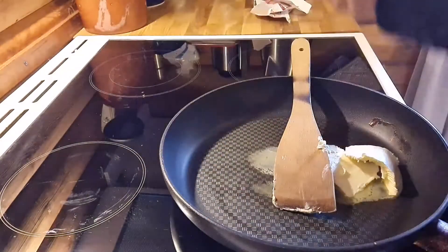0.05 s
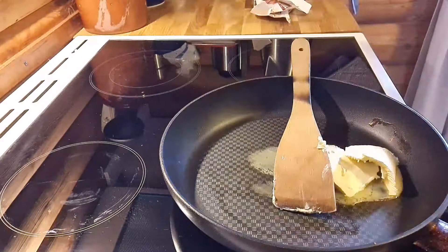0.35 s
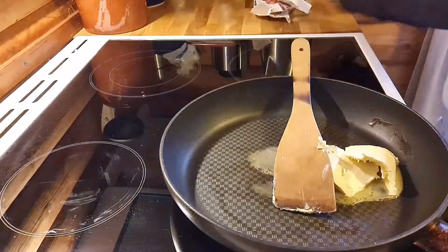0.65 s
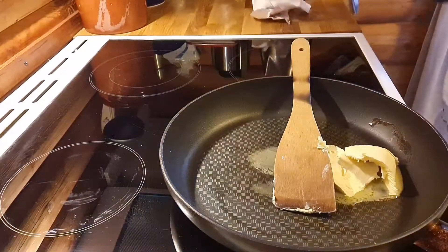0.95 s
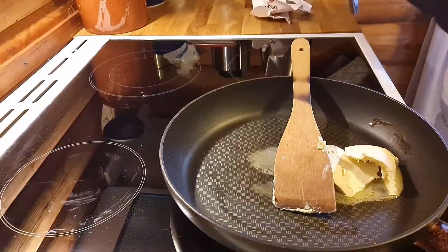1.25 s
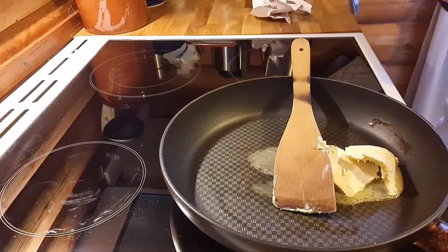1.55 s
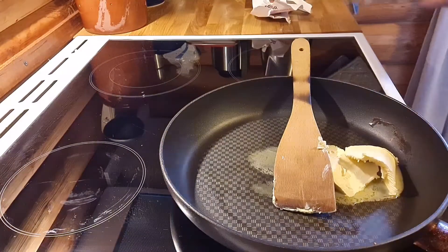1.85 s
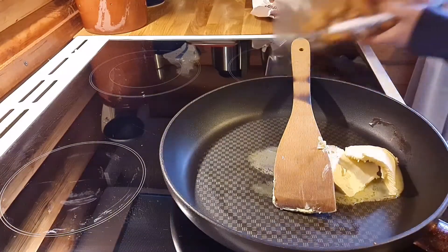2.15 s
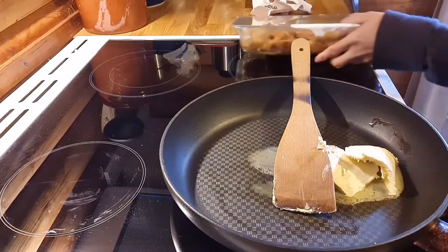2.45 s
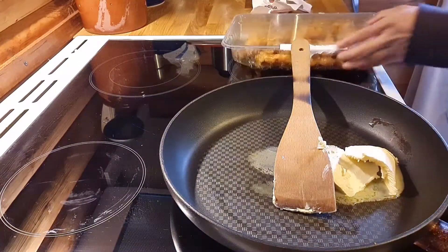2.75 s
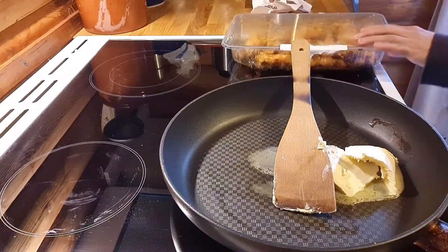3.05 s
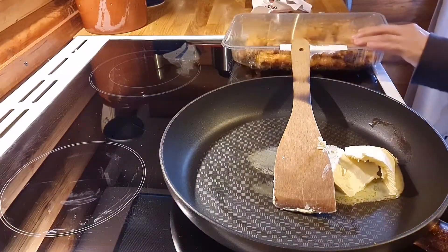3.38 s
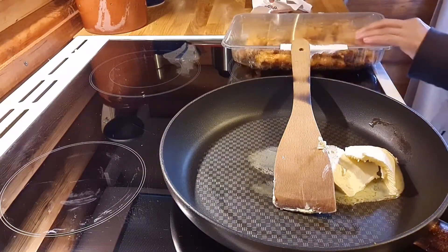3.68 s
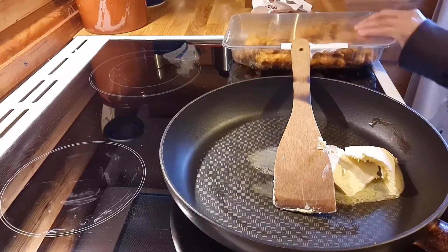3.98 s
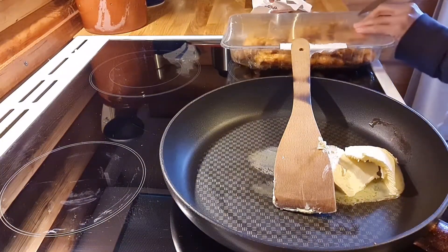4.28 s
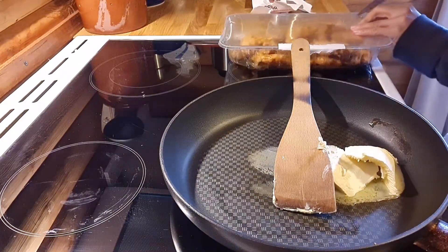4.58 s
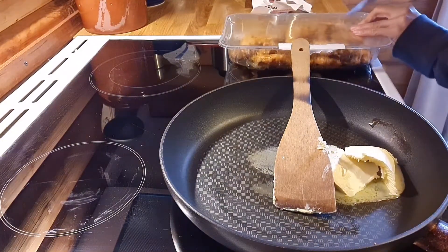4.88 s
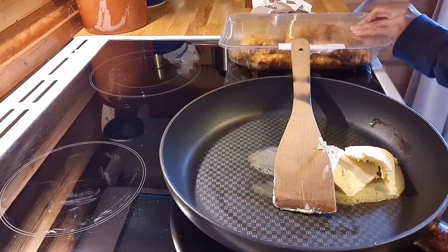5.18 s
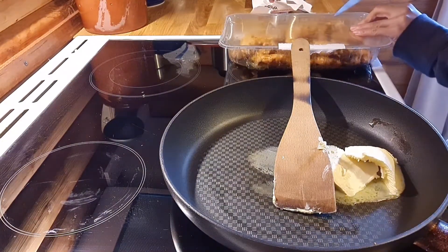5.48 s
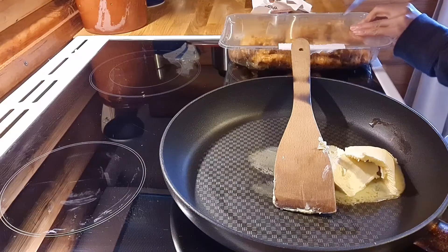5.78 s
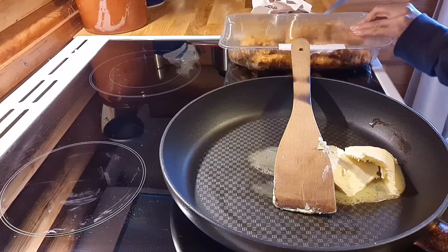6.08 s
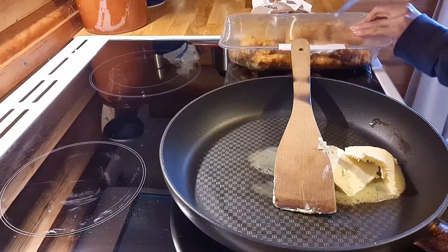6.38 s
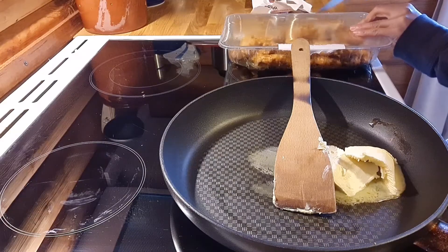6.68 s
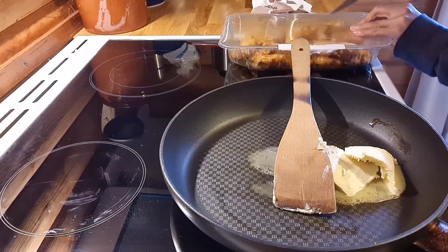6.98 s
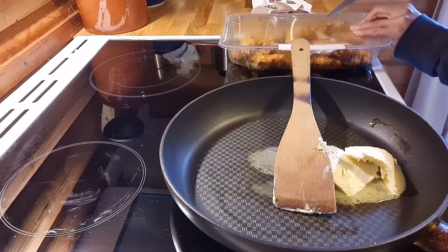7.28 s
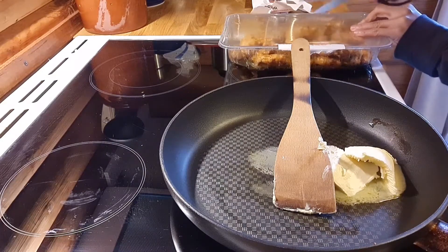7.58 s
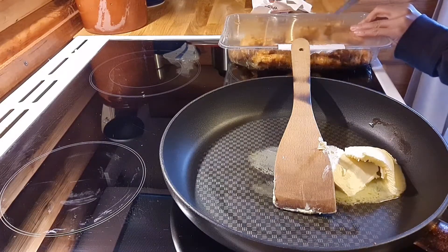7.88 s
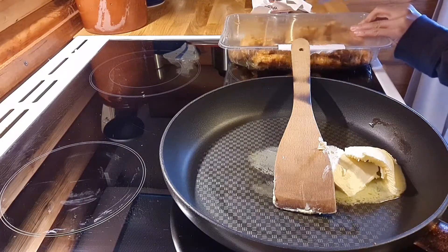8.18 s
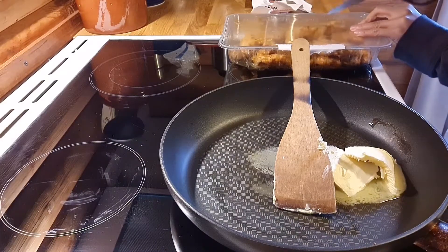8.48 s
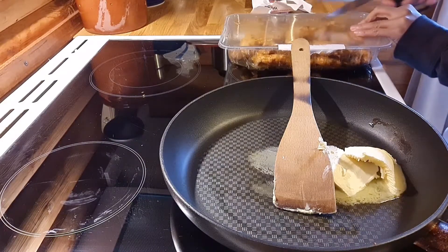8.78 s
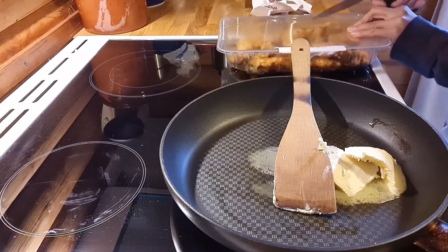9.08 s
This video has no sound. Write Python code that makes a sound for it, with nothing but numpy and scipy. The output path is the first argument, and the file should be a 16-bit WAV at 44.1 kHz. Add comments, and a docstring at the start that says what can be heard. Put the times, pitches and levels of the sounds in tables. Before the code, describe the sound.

A thin plastic food tray is set down and prised open, with snaps, crunches, rubbing and dull bumps over a low hum.

```python
"""In a small kitchen, a thin plastic food tray is slid out of its wrap, set down on a glass hob
and prised at until its lid gives. The plastic buckles in snaps and crunches, and patches of the lid
flip with a hollow tock. Film and fingers rub over the tray; it scrapes, rocks and bumps, and the
hob booms under it. The room gives a short echo, over the low hum of an appliance."""
import sys
import numpy as np
from scipy import signal
from scipy.fft import rfft, irfft
from scipy.io import wavfile

SR = 44100
rng = np.random.default_rng(int(sys.argv[2]) if len(sys.argv) > 2 else 0)


def materialize(psi):
    """Save the field psi as 16-bit PCM at rate SR to the path in sys.argv[1].

    A 1-D psi becomes a single channel; in a 2-D psi each row is a channel.
    """
    bounded = np.clip(np.atleast_2d(psi).T, -1, 1)
    quanta = np.round(bounded * 32767).astype(np.int16)
    wavfile.write(sys.argv[1], SR, quanta)


N = 407484


def buckle(db, thud_db, crack_db, fizz_db, ring_ms, build_ms, pop=3.3, energy_ms=4.3, size=2048):
    """One buckle: tiny slips build up, then the plastic sheet pops over and flutters out."""
    # pitch ranges of the thud, body, crack and fizz: low_hz, high_hz
    ranges = [(80, 400), (400, 2000), (2500, 8000), (8000, 16000)]
    ms = (np.arange(size) - size // 2) * 1000 / SR  # the pop lies in the middle
    force = rng.standard_normal(size) * np.exp(-np.maximum(ms / ring_ms, -ms / build_ms))
    force[size // 2] += pop * np.sqrt(ring_ms) * undb(0.25 * crack_db)  # dull knocks pop less
    # a crack has no pitch, so even out its peaks and dips
    spectrum = rfft(force, 2 * size)
    force = irfft(spectrum * causal(-.75 * np.log(np.abs(spectrum) + 1e-3)))
    force *= np.sqrt(energy_ms * SR / 1000 / np.sum(force ** 2))
    low, high = np.transpose(ranges)
    db_per_hz = db + np.array([thud_db, 0, crack_db, fizz_db]) - 10 * np.log10(2 * (high - low) / SR)
    return through(force, response(np.c_[np.sqrt(low * high), db_per_hz], size=size))


def buckles(events, ring_ms, build_ms, echo_db=3.5, hidden=0.074, shell_db=2.5, size=2048):
    """The plastic shell buckles at a new spot each time, so each blow has its own echo."""
    # tone of the shell: pitch_hz, level_db
    shell_tone = [(30, -21.5), (70, -17.5), (100, -3), (140, 4), (190, -5.5), (270, -4), (600, -5),
                  (1000, -3), (1700, 1.5), (2400, -1.5), (3300, 0), (4500, 2.5), (9000, 2.5), (13000, 1),
                  (16000, -2)]
    out, shell = np.zeros((2, N)), undb(shell_db) * response(shell_tone)
    for start_s, db, thud_db, crack_db, fizz_db in events:
        blow = through(buckle(db, thud_db, crack_db, fizz_db, ring_ms, build_ms), shell)
        room_db = echo_db - hidden * crack_db  # dull blows come from the covered side: more echo
        add(out, start_s - size // 2 / SR, kitchen(blow, room_db) / np.hypot(1, undb(room_db)))
    return out


def snaps(drag):
    """The shell gives all at once, in sharp snaps and in small creases as it slides."""
    # sudden buckles: time_s, level_db, thud_db, crack_db, fizz_db (last three added to level_db)
    sudden_buckles = [(0.003, -31.5, -7.5, -24, -28), (0.05, -42.5, -25, -21.5, -20),
                      (0.386, -36, -7, -9, -14), (0.466, -38, -23.5, 5, 7), (0.992, -42.5, -37, -3.5, -21),
                      (1.096, -54, -3, -3, -14), (1.238, -45.5, 14.5, -12.5, -8.5),
                      (1.853, -38, -17, -16, -21), (1.966, -51, -9, -4, -1), (2.076, -62, 3, -8.5, 0),
                      (2.444, -26, -7, -21, -28.5), (2.469, -34, -4.5, -14, -22),
                      (2.516, -17.5, -5.5, -23.5, -34), (2.917, -30, -2.5, -1, -11),
                      (3.386, -52.5, 8.5, -1.5, -11.5), (4.537, -52, -0.5, -9, -8),
                      (5.642, -46.5, -8, -19, -27), (5.728, -71, 3, -7, 10), (6.021, -26, -2, -7.5, -8),
                      (6.107, -40.5, -16, -17.5, -19), (6.266, -37.5, -23.5, -20, -20.5),
                      (7.013, -41, 3.5, -27.5, -32.5), (7.304, -49.5, -13.5, -45, -27),
                      (7.503, -33, -18.5, -27.5, -34), (7.551, -21.5, -16, -38, -56),
                      (7.61, -26, -6.5, -15.5, -26), (8.026, -24, -17.5, -32.5, -43),
                      (8.065, -15.5, -33, -7, -21), (8.084, -17, -8.5, -20, -20),
                      (8.189, -23, -14, -15.5, -20.5), (8.585, -35, 6.5, -35.5, -40),
                      (8.624, -42, -1, -22, -29), (8.898, -19, -6.5, -17, -28.5),
                      (9.154, -47.5, 6, -22, -22)]
    return buckles(sudden_buckles + creases(drag), ring_ms=2.5, build_ms=0.27)


def crunches():
    """Creases in the shell build up before they give."""
    # slower buckles: time_s, level_db, thud_db, crack_db, fizz_db (last three added to level_db)
    slow_buckles = [(0.546, -23.5, -1, -10.5, -10), (0.574, -21.5, -21, -13, -34),
                    (0.587, -23.5, -27, -21, -32), (0.664, -33.5, 1, -15, -24), (1.562, -33, -36, -20, -53),
                    (2.288, -31.5, 1, -12, -29), (2.596, -32, -6.5, -21, -14.5),
                    (2.791, -25.5, 2.5, -8, -10), (4.281, -25.5, -4, -26, -31),
                    (6.558, -23.5, -8, -14.5, -22), (6.706, -26.5, -9.5, -33, -35),
                    (6.718, -24.5, -20, -25, -38), (8.222, -20, -8, -15.5, -18),
                    (8.236, -26.5, -5, -33, -35), (8.779, -30, -27, -18.5, -21),
                    (9.175, -31.5, -14, -17.5, -22.5)]
    return buckles(slow_buckles, ring_ms=5.2, build_ms=3.0)


def creases(drag, count=44, above_drag_db=8, scatter_db=3, thud_db=-14, crack_db=-14.5, fizz_db=-22.5):
    """List small creases that give at random moments, louder when the tray slides harder."""
    moments = rng.integers(0, N, count)
    levels = 20 * np.log10(drag[moments] + 1e-6) + above_drag_db + scatter_db * rng.standard_normal(count)
    return [(i / SR, db, thud_db, crack_db, fizz_db) for i, db in zip(moments, levels)]


def tray(sound, direct=0.58, ring=0.48, size=4096):
    """The tray's walls pass each sound on and ring briefly at their own pitches."""
    # ringing of the walls (wider fades sooner): pitch_hz, width_hz, level_db
    wall_notes = [(280.4, 14, 6), (447, 26, -11.5), (503, 110, 1), (618, 13, -0.5), (754, 43, 2),
                  (842, 160, 1.5), (1010, 28, 2), (1320, 9.7, -0.5), (1485, 9.1, -7.5), (1857, 6.1, -1.5),
                  (2770, 720, -8.5), (4100, 580, -6)]
    t, walls = np.arange(size) / SR, np.zeros(size)
    for hz, width, db in wall_notes:
        fade = 2 * np.pi * width / SR * np.exp(-np.pi * width * t)
        walls += ring * undb(db) * fade * np.cos(2 * np.pi * hz * t)
    walls[0] += direct
    return np.array([through(ear, walls) for ear in sound])


def tocks(fade_s=0.068):
    """A patch of the lid flips over with a hollow tock, at a pitch set by its size."""
    # flips: start_s, level_db, pitch_hz
    flips = [(6.266, -42, 788), (6.718, -33.5, 1315), (7.609, -30, 1034), (8.025, -33, 950),
             (8.225, -32, 1450), (9.174, -45, 1030)]
    out = np.zeros(N)
    for start_s, db, hz in flips:
        add(out, start_s, undb(db) * ringing(hz, fade_s, contact_s=1 / hz))
    return out


def strokes(drop_db=13.5, roundness=1.41):
    """How strongly the tray slides and the film rustles as each hand stroke speeds up and slows."""
    # hand strokes: fastest_s, rise_s, fall_s, drag_db, crinkle_db
    hand_moves = [(0.10, 0.17, 0.65, -47.5, -58), (0.39, 0.011, 0.037, -59, -49.5),
                  (0.529, 0.059, 0.05, -33.5, -37.5), (0.66, 0.062, 0.077, -47.5, -77),
                  (0.785, 0.09, 0.11, -86, -60.5), (0.995, .006, 0.12, -57, -59.5),
                  (1.249, 0.02, 0.094, -47, -65), (1.48, 0.1, 0.14, -51, -72.5),
                  (1.688, 0.099, .12, -45, -60), (1.864, 0.09, 0.12, -50.5, -65),
                  (2.21, 0.042, 0.032, -55, -84), (2.325, 0.057, .1, -43.5, -63.5),
                  (2.604, 0.011, 0.026, -37, -61), (2.786, 0.067, 0.01, -49, -43.5),
                  (3.033, 0.075, 0.058, -50, -64.5), (3.41, 0.24, 0.26, -70.5, -80.5),
                  (3.8, 0.2, 0.12, -78.5, -76), (4.098, .13, 0.13, -54.5, -59),
                  (4.539, 0.068, 0.1, -65, -75.5), (4.85, .2, 0.18, -84, -84.5),
                  (5.48, 0.15, 0.099, -69.5, -76.5), (5.655, 0.029, 0.12, -69, -80),
                  (5.99, 0.032, 0.025, -70.5, -63.5), (6.16, .04, 0.16, -70.5, -78.5),
                  (6.53, 0.036, .015, -64.5, -70.5), (7.11, .06, 0.089, -72, -81.5),
                  (7.34, 0.12, 0.35, -73, -80), (7.562, 0.062, 0.062, -45.5, -61.5),
                  (8.82, .11, 0.17, -52, -62)]
    power = np.zeros((2, N))
    for fastest_s, rise_s, fall_s, drag_db, crinkle_db in hand_moves:
        t = np.arange(-int(3 * rise_s * SR), int(3 * fall_s * SR)) / SR
        speed = undb(-drop_db * np.maximum(-t / rise_s, t / fall_s) ** roundness)
        add(power, fastest_s + t[0], (undb([[drag_db], [crinkle_db]]) * speed) ** 2)
    return np.sqrt(power)


def rubbing(drag, crinkle, slide_db=-3, chatter_share=0.5, film_db=-2):
    """Each stroke drags the tray (dull, coarse) and crinkles the film (bright, fine)."""
    # tone of the sliding tray: pitch_hz, level_db
    slide_tone = [(60, -33.5), (140, 2.5), (300, -3.5), (550, -4.5), (900, -6.5), (1800, -5.5),
                  (3000, -12.5), (6000, -23.5), (16000, -40.5)]
    # tone of the film: pitch_hz, level_db
    film_tone = [(500, -33), (2000, 1.5), (4000, -0.5), (7500, 4.5), (9500, -0.5), (13000, 0.5),
                 (16000, -5.5)]
    coarse = friction(per_s=900, spread_db=0.5, hiss_share=0.98) + chatter_share * chatter()
    fine = friction(per_s=1800, spread_db=8.0, hiss_share=0.26)
    slide = undb(slide_db) * drag * unit(through(coarse, response(slide_tone)))
    film = undb(film_db) * crinkle * unit(through(fine, response(film_tone)))
    return (kitchen(slide, echo_db=0) + kitchen(film, echo_db=9))[:, :N]


def friction(per_s, spread_db, hiss_share):
    """Surfaces stick and slip, making uneven ticks over a smooth hiss."""
    chance, sign, hiss = rng.random(N), rng.standard_normal(N), rng.standard_normal(N)
    sizes = undb(spread_db * np.minimum(rng.exponential(size=N), 4))
    ticks = (chance < per_s / SR) * np.sign(sign) * sizes
    return unit(unit(ticks) + hiss_share * hiss)


def chatter(per_s=260, spread_db=4.0, low_hz=350, high_hz=3800, cycles=4.5, size=1024):
    """Small folds catch and let go, each ringing briefly at a pitch of its own."""
    out, t = np.zeros(N), np.arange(size) / SR
    for when, pitch, luck in rng.random((int(per_s * N / SR), 3)):
        hz = low_hz * (high_hz / low_hz) ** pitch
        strength = undb(-spread_db * np.log(luck + .03)) * hz
        add(out, when * N / SR, strength * np.sin(2 * np.pi * hz * t) * np.exp(-hz * t / cycles))
    return unit(out)


def bumps(fade_cycles=19):
    """The weight of the food booms in the surface below; low booms last longer."""
    # landings of the tray: start_s, level_db, pitch_hz
    landings = [(0.002, -27, 270), (0.634, -24.5, 120.4), (0.645, -34, 282), (1.243, -31.5, 116),
                (2.301, -42, 154), (2.533, -29.5, 69.2), (2.785, -26.5, 241), (2.803, -28, 71.2),
                (2.933, -28, 135), (2.972, -27, 159), (4.278, -27.5, 99), (8.238, -29.5, 153)]
    out = np.zeros(N)
    for start_s, db, hz in landings:
        add(out, start_s, undb(db) * ringing(hz, fade_cycles / hz, contact_s=1.1 / hz))
    return out


def rocking():
    """The tray rocks to rest: its rim ticks and its loaded floor answers dully, never quite alike."""
    # touches of the rim: start_s, level_db, hardness_db (treble boost per octave)
    touches = [(2.917, -46.5, 10.5), (2.952, -40.5, -1), (3.154, -61, 5), (3.177, -51, -6),
               (3.339, -60.5, 1.5), (3.384, -51, -1)]
    # ringing of the rocked tray: pitch_hz, level_db, fade_s
    notes = [(291, 12, 0.086), (520, -5.5, 0.11), (1020, -10.5, 0.067), (1118, -3.5, 0.057),
             (1700, -30.5, 0.031)]
    out, lowest_hz = np.zeros(N), notes[0][0]
    for start_s, db, hardness_db in touches:
        for hz, note_db, fade_s in notes:
            strength = undb(db + note_db + hardness_db * np.log2(hz / lowest_hz))
            add(out, start_s, strength * ringing(hz * rng.uniform(.975, 1.025), fade_s, contact_s=1 / hz))
    return out


def scrapes(band_ratio=1.5):
    """The rim judders under a finger or along the surface, swelling and fading around a rough pitch."""
    # scrapes of the rim: start_s, length_s, level_db, pitch_hz
    rim_scrapes = [(1.227, 0.098, -59.5, 213), (1.377, 0.15, -51.5, 139), (1.824, 0.074, -49.5, 600),
                   (2.266, 0.12, -44, 950), (2.705, 0.096, -54.5, 810), (2.788, 0.0097, -28.5, 870),
                   (4.992, 0.1, -71, 980), (5.423, 0.089, -77.5, 920)]
    out, slips = np.zeros(N), friction(per_s=270, spread_db=6.0, hiss_share=0.96)
    for start_s, length_s, db, hz in rim_scrapes:
        band = signal.butter(2, [hz / band_ratio, hz * band_ratio], "bandpass", fs=SR, output="sos")
        judder = unit(signal.sosfilt(band, slips[int(start_s * SR):int((start_s + length_s) * SR)]))
        add(out, start_s, undb(db) * judder * signal.windows.tukey(len(judder)))
    return out


def rumble(handling, gain_db=-31, follow=0.52, linger_samples=4000):
    """Handling shakes the worktop, which rumbles on a little after each move."""
    # tone of the worktop: pitch_hz, level_db
    worktop_tone = [(15, -25.5), (30, -8), (50, 2.5), (75, -1), (130, -5), (220, -21.5), (600, -62.5)]
    effort = signal.lfilter([1 / linger_samples], [1, 1 / linger_samples - 1], np.abs(handling[0]))
    shaking = unit(through(rng.standard_normal(N), response(worktop_tone)))
    return undb(gain_db) * effort ** follow * shaking


def kitchen(sound, echo_db, build_s=0.0003, right_lag_samples=8, size=10240):
    """Sound reaches the left side first; hob, worktop and walls answer with a short, dense echo."""
    # the room's echo: pitch_hz, fade_s (to fall 60 dB), level_db
    echo_bands = [(100, 0.43, -5.5), (264.5, 0.25, 1), (700, 0.19, -2.5), (1800, 0.18, -1),
                  (5230, 0.15, -1), (13000, 0.16, 0)]
    t, hz = np.arange(size) / SR, np.fft.rfftfreq(size, 1 / SR)
    noise, echo = rfft(diffuse(size)), 0
    centres = np.transpose(echo_bands)[0]
    for share, (_, fade_s, db) in zip(np.eye(len(echo_bands)), echo_bands):
        band = irfft(noise * read(np.c_[centres, share], hz))
        echo = echo + undb(db) * band * np.exp(-np.log(1000) * t / fade_s)
    echo = unit(echo * (1 - np.exp(-t / build_s))) * undb(echo_db) / np.sqrt(size)
    echo[0, 0] += 1  # the direct sound
    echo[1, right_lag_samples] += 1
    return signal.oaconvolve(sound[None], echo, axes=1)


def hum(waver_db=3.5, wander_hz=4, swell_db=3.0, air_db=-62, left_db=-1.5):
    """An appliance hums in low, wavering tones over the room's rumble and faint hiss."""
    # tones of the appliance: pitch_hz, level_db
    hum_notes = [(73, -63), (116, -62), (240, -77)]
    # tone of the still room: pitch_hz, level_db
    air_tone = [(20, -14), (45, -1), (70, 0), (140, -1), (200, -10), (310, -22), (500, -27), (1000, -32),
                (2000, -42.5), (4000, -46), (8000, -45), (15000, -46.5)]
    tones = np.zeros(N)
    for hz, db in hum_notes:
        strength = undb(db + waver_db * drift(9.8)) * np.sqrt(2)
        pitch_hz = hz + wander_hz * drift(17)
        tones += strength * np.sin(2 * np.pi * np.cumsum(pitch_hz) / SR)
    air = unit(np.array([through(ear, response(air_tone)) for ear in diffuse(N)]))
    return (tones * undb(swell_db * drift(15)) + undb(air_db) * air) * undb([[left_db], [0]])


def diffuse(size, alike_below_hz=480):
    """Noise from all sides: left and right are alike in the bass, unrelated in the treble."""
    likeness = .97 / (1 + (np.fft.rfftfreq(size, 1 / SR) / alike_below_hz) ** 3)
    mid, side = rfft(rng.standard_normal((2, size)))
    mid, side = mid * np.sqrt((1 + likeness) / 2), side * np.sqrt((1 - likeness) / 2)
    return irfft([mid + side, mid - side], size)


def ringing(hz, fade_s, contact_s):
    """One softly struck note that falls 60 dB in fade_s."""
    t = np.arange(SR // 2) / SR
    return np.sin(2 * np.pi * hz * t) * np.exp(-np.log(1000) * t / fade_s) * (1 - np.exp(-t / contact_s))


def drift(per_s):
    """Glide between random values, mostly within -1 to 1."""
    values = rng.standard_normal(int(N / SR * per_s) + 2)
    return np.interp(np.arange(N) / SR * per_s, np.arange(len(values)), values)


def undb(db):
    """Turn decibels into a multiplier."""
    return 10 ** (np.asarray(db) / 20)


def unit(x):
    """Scale to an average strength (rms) of 1."""
    return x / np.sqrt(np.mean(x ** 2))


def add(out, start_s, x):
    """Mix x into out from start_s on."""
    i = int(start_s * SR)
    x, i = x[..., max(-i, 0):], max(i, 0)
    out[..., i:i + x.shape[-1]] += x[..., :N - i]


def read(points, hz):
    """Read between (pitch_hz, value) points, with octaves evenly spaced."""
    pitches, values = np.transpose(points)
    return np.interp(np.log(hz + 1e-3), np.log(pitches), values)


def response(points, size=4096):
    """A filter's answer to one click, given its tone as (pitch_hz, level_db) points."""
    return irfft(causal(np.log(undb(read(points, np.fft.rfftfreq(size, 1 / SR))))))


def causal(log_gain):
    """Spectrum of the quickest-answering filter with these log gains."""
    cepstrum = irfft(log_gain)
    half = len(cepstrum) // 2
    cepstrum[1:half] *= 2
    cepstrum[half + 1:] = 0
    return np.exp(rfft(cepstrum))


def through(x, click_response):
    """Pass x through a filter, keeping its length."""
    return signal.oaconvolve(x, click_response)[:len(x)]


def scene():
    """Tray and film in the kitchen, over the hum."""
    drag, crinkle = strokes()
    plastic = tray(snaps(drag) + crunches() + rubbing(drag, crinkle))
    contacts = kitchen(rocking() + scrapes() + tocks(), echo_db=-1.5)[:, :N]
    handling = plastic + contacts
    return handling + bumps() + rumble(handling) + hum()


def record(dry, left_cut_hz=20, top_hz=15900):
    """The left side loses a little deep bass; both sides lose the highest treble."""
    left = signal.sosfilt(signal.butter(1, left_cut_hz, "highpass", fs=SR, output="sos"), dry[0])
    return signal.sosfilt(signal.ellip(10, .2, 70, top_hz, fs=SR, output="sos"), [left, dry[1]])


dry = scene()
out = record(dry)
materialize(out)
```